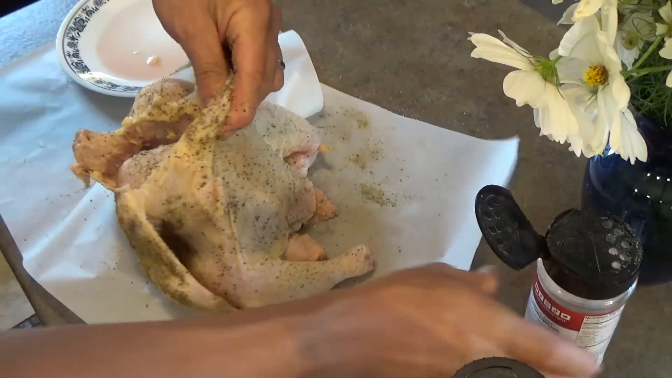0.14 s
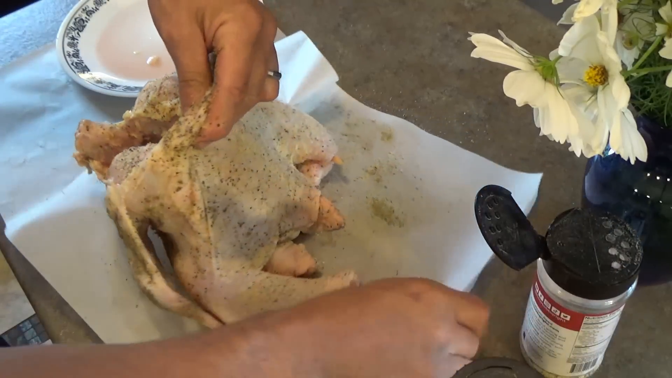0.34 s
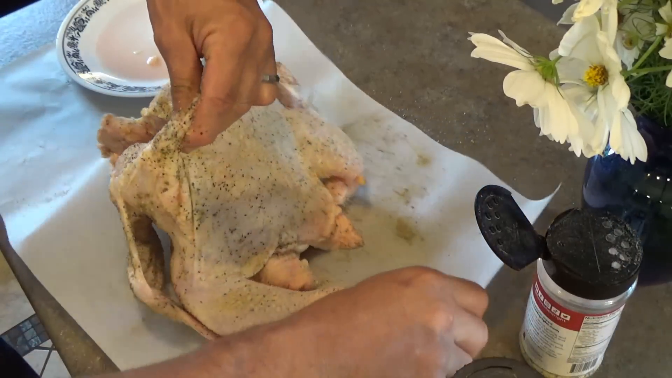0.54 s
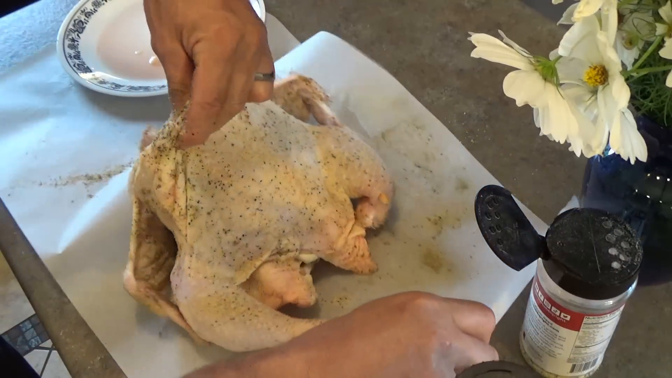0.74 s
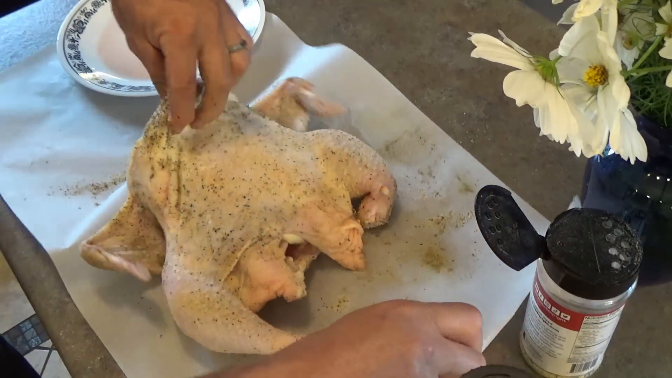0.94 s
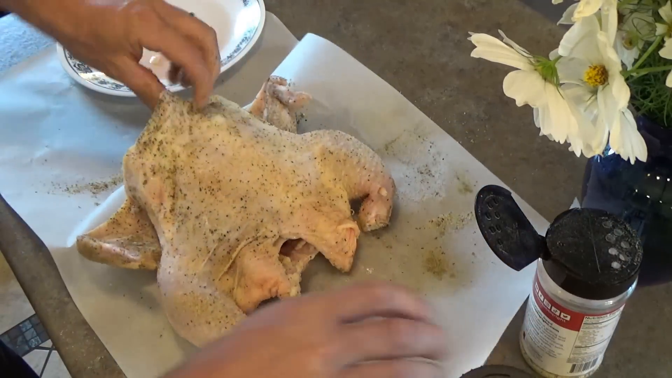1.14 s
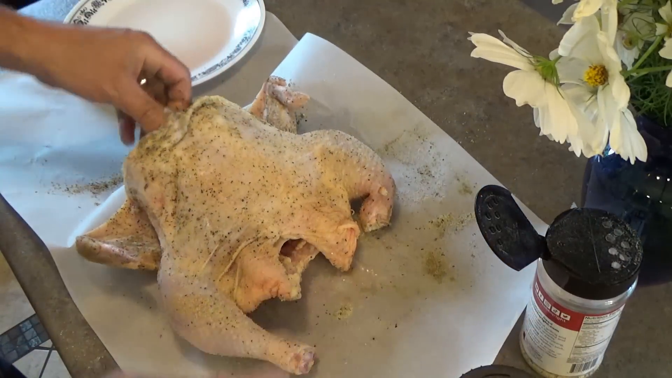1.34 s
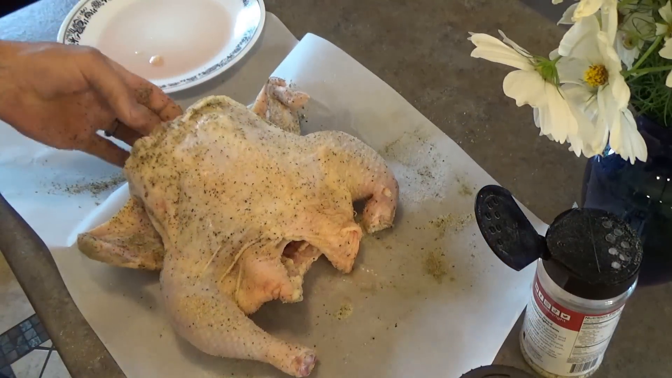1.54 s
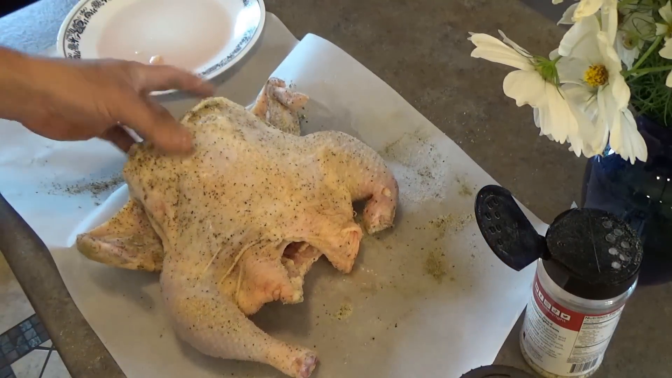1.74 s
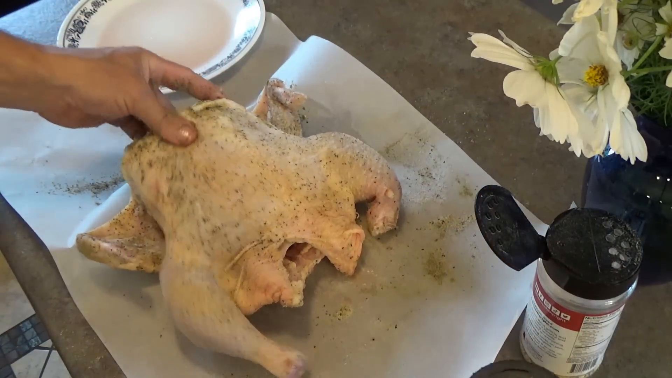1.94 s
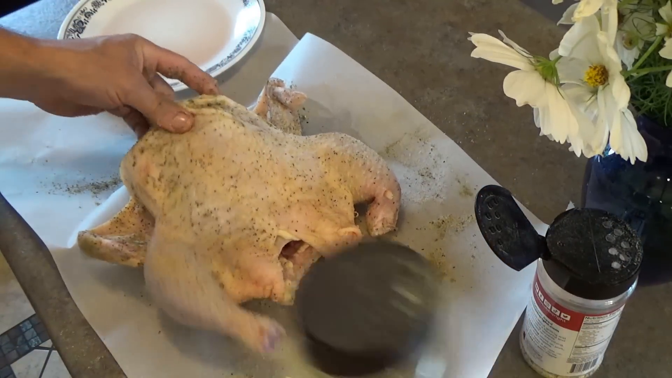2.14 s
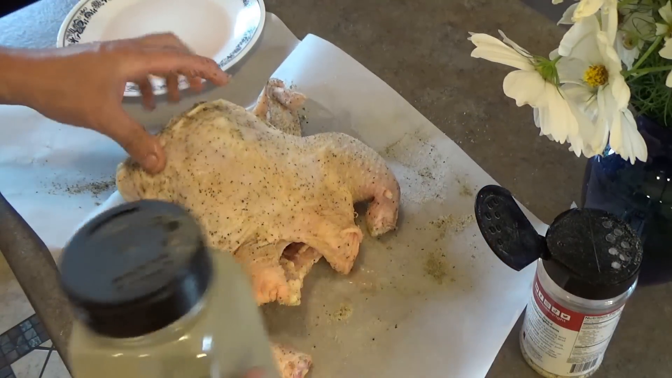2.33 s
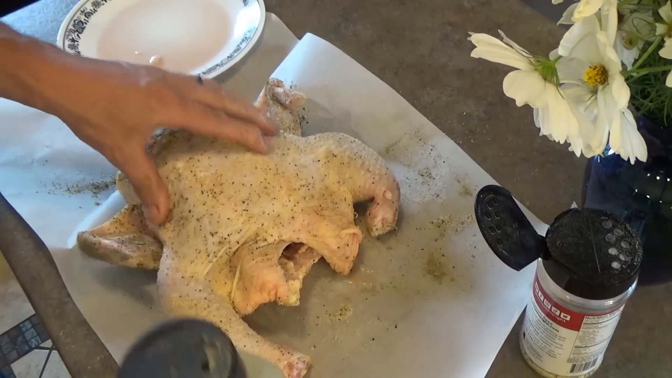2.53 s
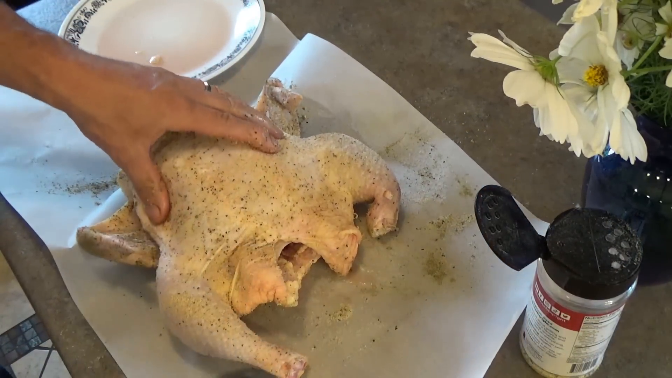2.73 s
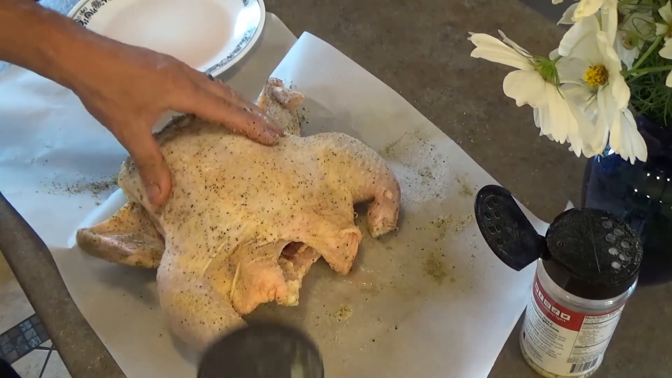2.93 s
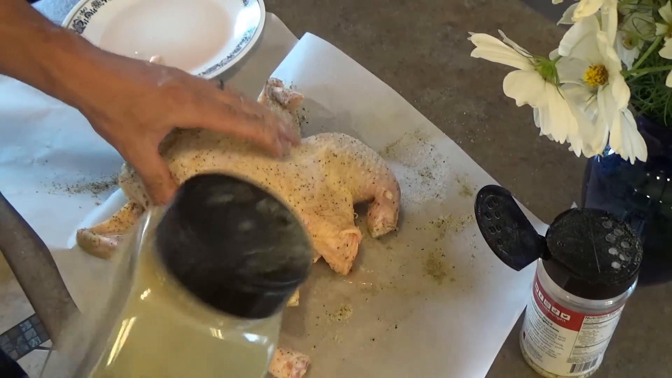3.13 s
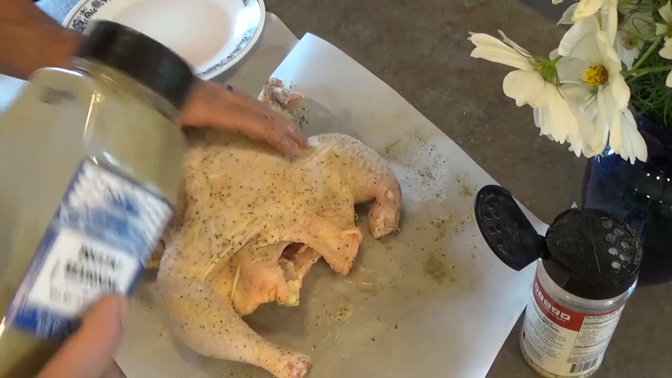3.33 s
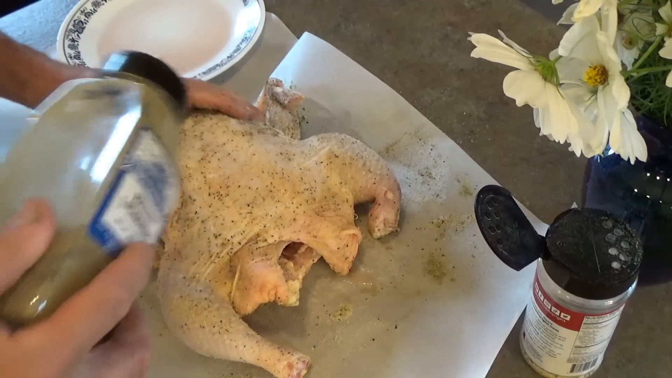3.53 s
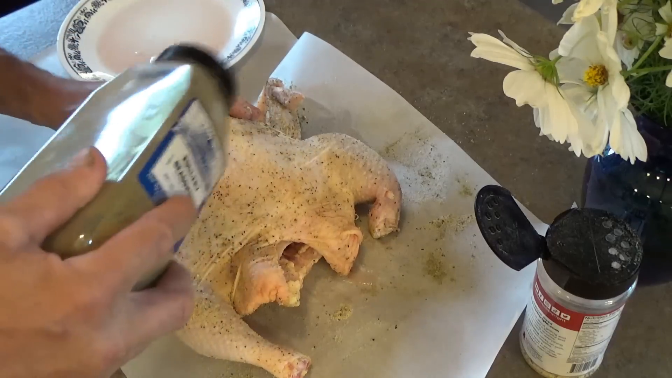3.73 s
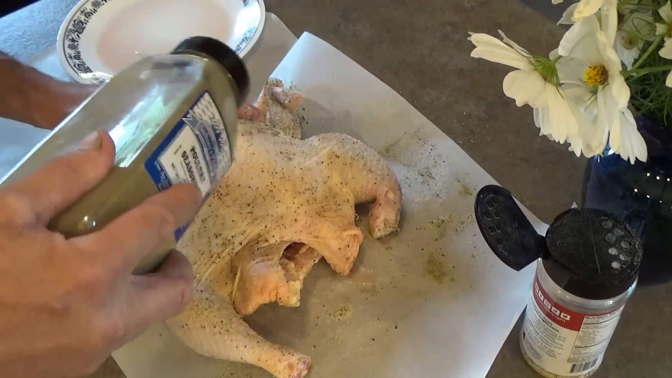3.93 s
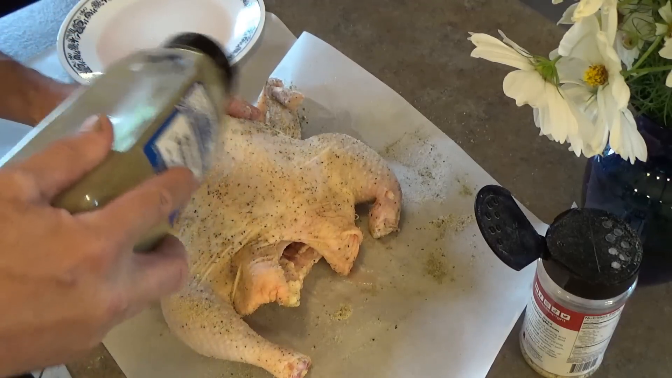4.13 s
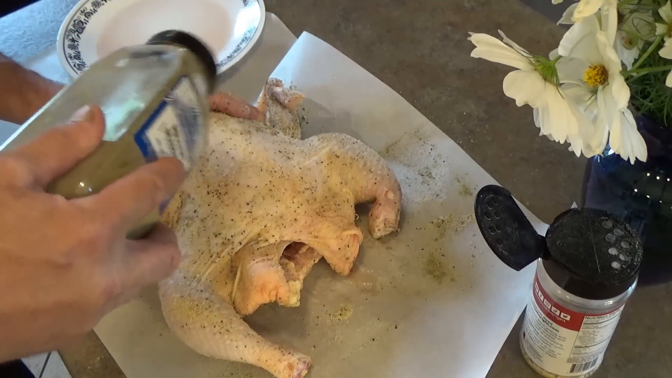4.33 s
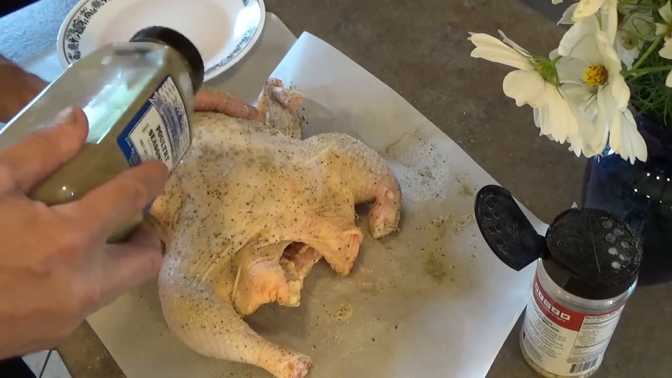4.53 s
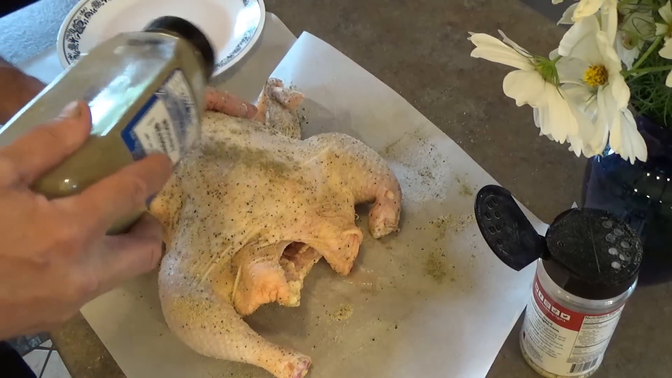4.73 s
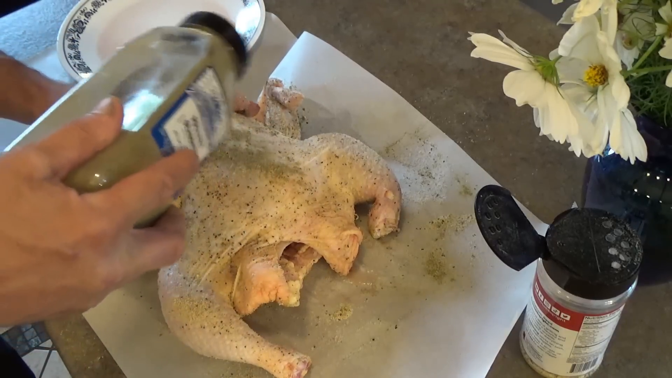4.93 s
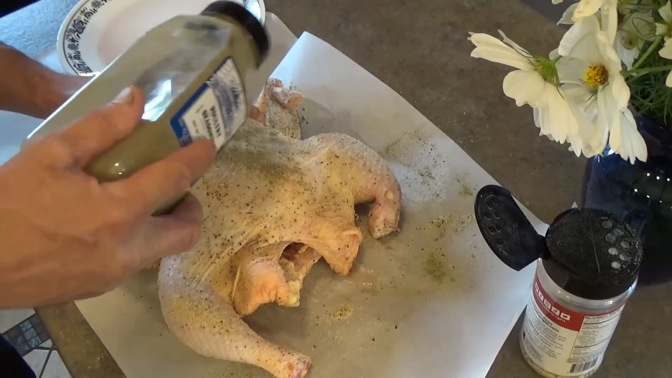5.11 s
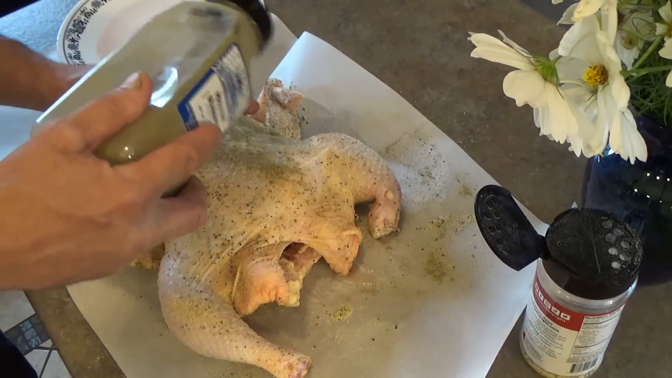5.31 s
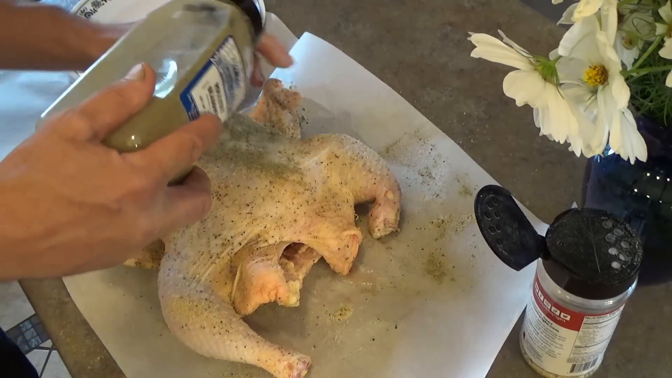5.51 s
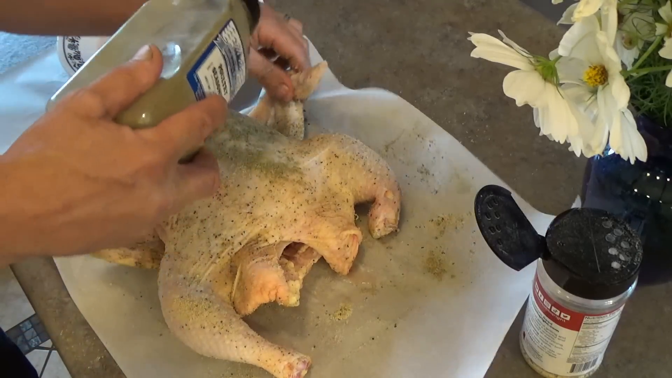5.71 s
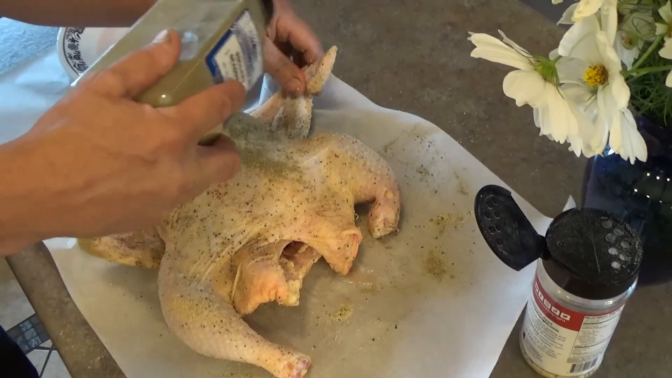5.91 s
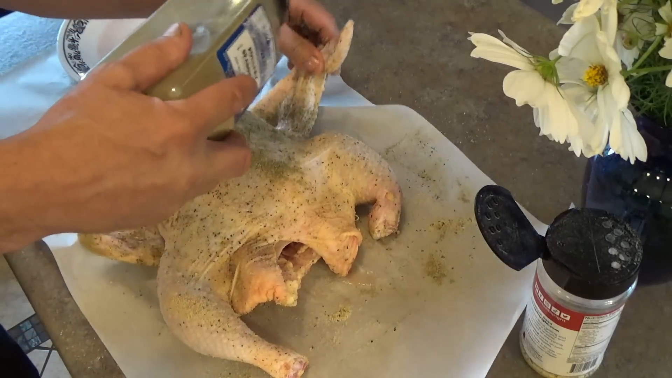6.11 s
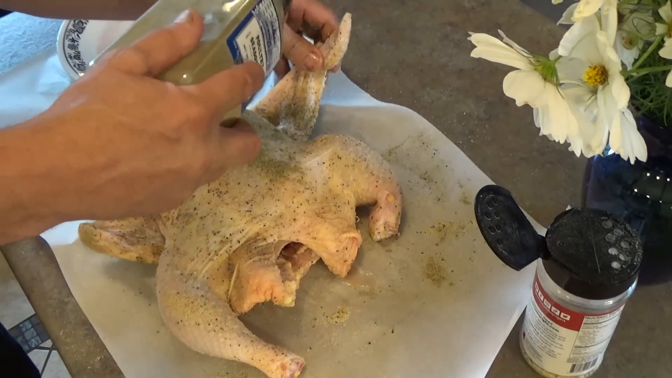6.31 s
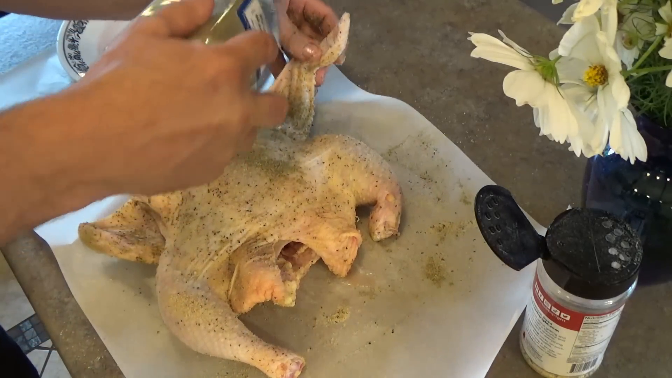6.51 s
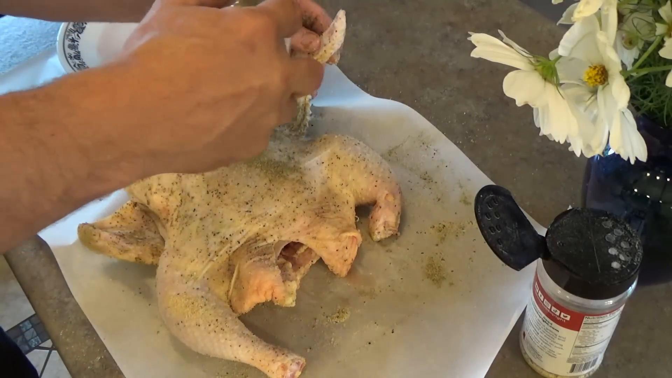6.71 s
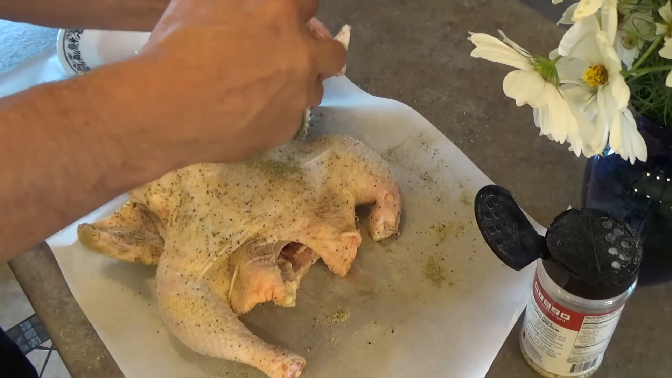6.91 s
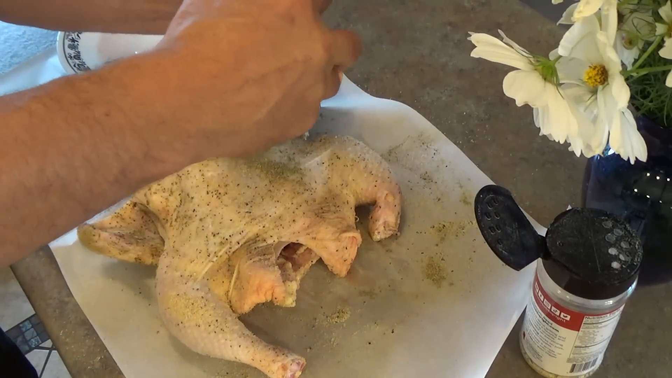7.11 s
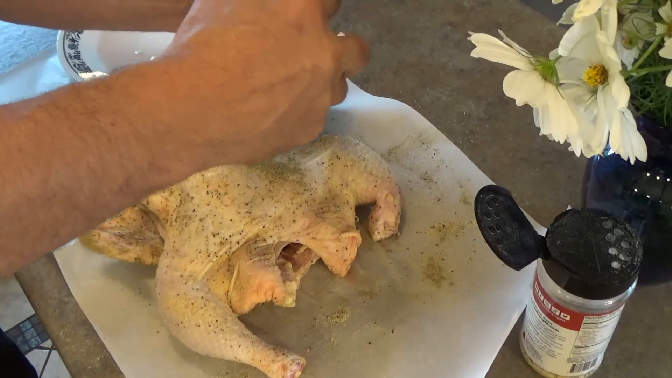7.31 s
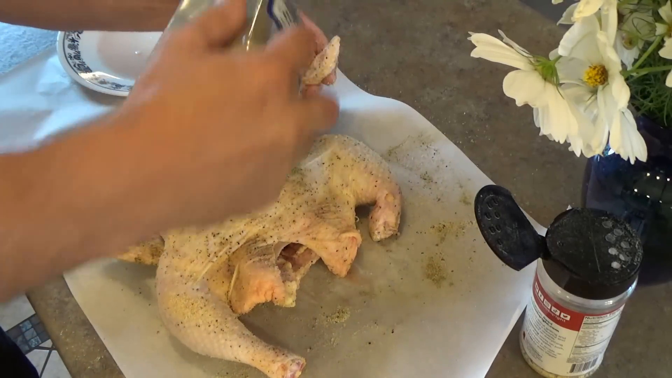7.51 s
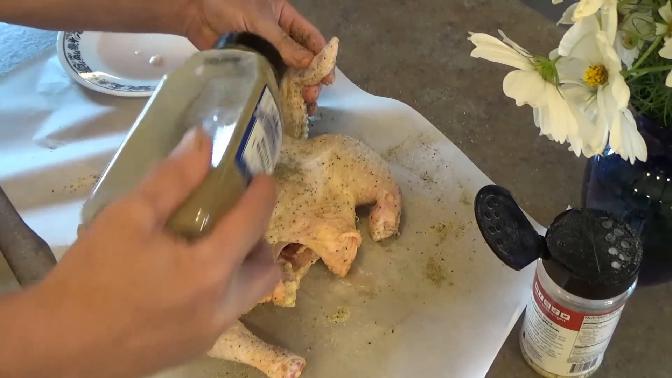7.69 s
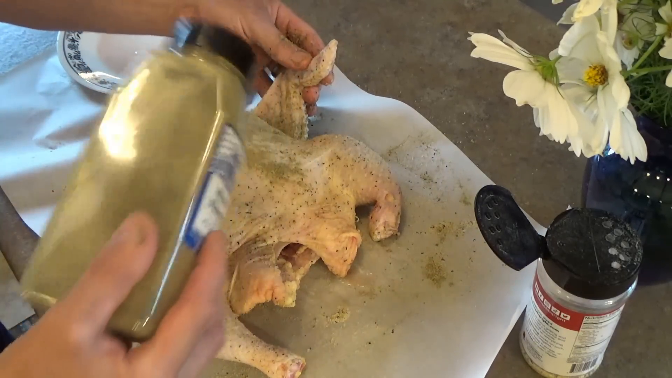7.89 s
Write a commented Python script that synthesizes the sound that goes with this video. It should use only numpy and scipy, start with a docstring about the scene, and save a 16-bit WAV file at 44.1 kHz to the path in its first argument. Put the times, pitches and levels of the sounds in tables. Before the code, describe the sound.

Butcher paper crackles and snaps loudly as a raw chicken is turned, then a bottle bumps and seasoning powder hisses in soft quick shakes.

```python
"""A raw chicken is turned on butcher paper close to the microphones in a small kitchen: buckling creases crackle and snap.
A big plastic bottle of seasoning bumps the counter, its damped modes ringing; tilts and soft strokes make the powder hiss.
Then a wing is lifted and the paper crackles again; hands rub wet skin, and fingers squeak on the plastic.
Something hollow clunks, a blow through a body's resonances.
Behind it all, coloured noise and hum lines make a fan, and a pulsed sine a faint electronic whine."""
import sys
import numpy as np
from scipy import signal
from scipy.fft import rfft, irfft
from scipy.io import wavfile
from scipy.ndimage import uniform_filter1d, minimum_filter1d

SR = 44100
rng = np.random.default_rng(int(sys.argv[2]) if len(sys.argv) > 2 else 0)


def master(y):
    """Save y as 16-bit WAV."""
    cut = np.clip(np.atleast_2d(y).T, -1, 1)
    pcm = np.round(cut * 32767)  # scale
    wavfile.write(sys.argv[1], SR, pcm.astype(np.int16))


N = 350581
TIME = np.arange(N) / SR  # [s]

# colour of the buckling paper: (frequency [Hz], relative density [dB per Hz])
PAPER_COLOUR = [(100, -42), (300, -21.5), (700, -6.5), (1100, -5), (1650, 0), (2600, -0.4), (5000, -0.16),
                (7000, -3), (9400, -4), (12000, -16.5), (16000, -26)]
# colour of the seasoning powder: (frequency [Hz], relative density [dB per Hz])
POWDER_COLOUR = [(400, -29), (1500, 3.5), (4300, 3.5), (9500, 0.5), (12000, -13), (16000, -30)]
# how hard the wrist strokes throw powder at the lid: (time [s], relative level [dB])
SHAKE_FORCE = [(3.6, -47), (4.0, -37.5), (4.3, -44.5), (4.8, -37.5), (5.1, -42.5), (5.45, -38.5)]


def paper(full_db=-18, clump_db=3.0, clump_s=.005, lowest_hz=180):
    """Loud snaps over a fine crackle that thickens as the sheet bends harder, and the duller rasp of the sheet sliding."""
    # the loudest creases snapping through: (time [s], level over 10 ms [dB], pitch [Hz], length [s])
    loud_creases = [(0.0389, -22, 5750, 0.0015), (0.0603, -16, 5670, 0.0011), (0.0914, -19, 3400, 0.0054),
                    (0.1627, -15, 5200, 0.003), (0.2044, -15.5, 6000, 0.0029), (.2105, -12, 3570, 0.013),
                    (0.2719, -15, 6500, 0.0014), (.2876, -14.5, 4200, 0.0048), (.3091, -11.5, 4940, .014),
                    (0.3391, -12.5, 4870, 0.005), (0.3632, -14.5, 6800, 0.002), (.3697, -17.5, 4800, .002),
                    (.385, -15, 5200, 0.0022), (.421, -14, 4900, 0.0063), (0.4365, -16, 4500, .002),
                    (.504, -14.5, 5200, 0.0036), (0.7375, -18.5, 3580, 0.0011),
                    (0.7665, -20, 4040, 0.00063), (0.8018, -14, 3570, 0.0033), (.8584, -21, 1890, 0.0045),
                    (0.8785, -11, 4900, 0.0025), (0.941, -16.5, 3450, 0.00084),
                    (.9635, -22.5, 5200, 0.00045), (.9931, -32, 5400, 0.00096),
                    (1.0024, -19.5, 5300, 0.00073), (1.2089, -25.5, 4500, 0.00056),
                    (1.2715, -34, 3930, 0.00089), (1.288, -31.5, 9000, 0.0011),
                    (1.4605, -26.5, 3500, 0.0014), (1.5612, -27, 4600, 0.0012),
                    (1.5698, -30.5, 2700, .0012), (1.6314, -22, 2750, 0.00075),
                    (1.9184, -26.5, 5900, 0.0013), (1.9336, -32, 3000, 0.001), (2.0862, -36, 5760, 0.001),
                    (2.1522, -26, 6000, 0.0008), (2.1788, -30, 4700, 0.0056), (4.7872, -36.5, 4000, 0.0011),
                    (4.8044, -33.5, 6100, 0.002), (5.5114, -17.5, 4300, 0.0032), (5.5475, -18, 5130, 0.011),
                    (5.7532, -25.5, 4200, 0.004), (5.7726, -18.5, 4400, 0.0014),
                    (5.9518, -23.5, 4800, 0.004), (6.0428, -10.5, 5800, 0.0019), (6.054, -20, 6000, 0.009),
                    (6.3207, -33.5, 4830, .002), (6.4444, -28.5, 5840, 0.016)]
    # how hard the sheet bends while the bird is turned: (time [s], crackle level [dB])
    turning = [(0, -30.5), (.18, -27), (.29, -22.5), (.48, -16), (.58, -20.5), (.75, -25), (.85, -23.5),
               (1.03, -23), (1.19, -43.5)]
    # hands push and pull at the bird and the sheet flexes: (start [s], length [s], crackle level [dB])
    flexes = [(1.2, 0.99, -44.5), (5.435, 0.072, -44.5), (5.496, 0.027, -27.5), (5.56, 0.9, -41),
              (5.738, 0.01, -34), (6.29, 0.041, -48.5), (6.605, 0.049, -45.5)]
    # the weight of the bird dragging the sheet over the counter: (time [s], level [dB])
    dragging = [(0, -51), (.48, -35.5), (.72, -33.5), (.88, -20.5), (1.15, -67)]
    # colour of the sliding sheet: (frequency [Hz], relative density [dB per Hz])
    sheet_colour = [(80, -29), (250, -20.5), (800, -0.5), (1600, 7.5), (2600, 4), (6000, -22)]

    bending = gain_curve(turning) + gestures(flexes, attack_s=0.0043, release_db_per_s=120)
    per_s = 14000 * (bending / from_db(full_db)) ** .8
    # one buckle sets off its neighbours, so the grains come in clumps
    clumps = from_db(clump_db * slow_noise(clump_s))
    crackle_grains = grains(per_s=per_s, spread_db=1.5, spectrum=PAPER_COLOUR, even_s=0.15)
    crackle = bending * rms_one(clumps) * crackle_grains
    lesser = bending * small_snaps()
    drag = gain_curve(dragging) * grains(per_s=2500, spread_db=6.5, spectrum=sheet_colour, even_s=0.056)
    loud = snaps(loud_creases, PAPER_COLOUR, focus=1.17, width_share=0.99)
    return high_pass(loud + crackle + lesser + drag, lowest_hz)


def small_snaps(per_s=25, level_db=-8, length_s=0.0023, spread_db=3):
    """Lesser creases give way at random, each in a short dying run of buckles; level is against the crackle's bending."""
    starts = (rng.random(N) < per_s / SR) * from_db(spread_db * rng.standard_normal(N))
    runs = signal.lfilter([1], [1, -np.exp(-1 / (length_s * SR))], starts + 1e-18)
    return from_db(level_db) * rms_one(coloured(runs * rng.standard_normal(N), PAPER_COLOUR))


def snaps(rows, spectrum, focus, width_share, low_share=0.23, crack_s=0.00023, size=2048):
    """Each snap is a crack and a dying run of tiny buckles that ring a patch of the sheet around its own pitch."""
    out, t = np.zeros(N), np.arange(size) / SR
    for (s, db, hz, length), buckles in zip(rows, rng.standard_normal((len(rows), size))):
        decay_s = 1.27 * max(length, 2e-4)
        run = unit_energy(buckles * np.exp(-(t / decay_s) ** 0.76))
        # the crack stands out only in a short snap
        force = run + signal.unit_impulse(size) * min(crack_s / max(length, 2e-4), 1)
        # a small patch radiates little below its pitch
        radiated = high_pass(force, low_share * hz)
        focused = radiated + focus * resonance(radiated, hz, width_share * hz)
        patch = unit_energy(coloured(focused, spectrum))
        add(out, s, from_db(db) * np.sqrt(SR / 100) * patch)  # level over 10 ms
    return out


def bottle(lowest_hz=205, size=8192):
    """Bumps and scraping ring the damped modes of the filled bottle; its wall and lid click under the fingers."""
    # the bottle rocking on the counter: (time [s], blow level before softening [dB], brightness [Hz])
    bumps = [(2.533, -9, 2190), (2.5798, -10, 560), (2.6725, -9.5, 330), (2.761, -18.5, 900)]
    # modes of the filled bottle: (frequency [Hz], relative level [dB], 60 dB decay time [s])
    modes = [(261, -11.5, 0.038), (364, -15, 0.049), (522, -9, 0.026), (720, -12.5, 0.026),
             (990, -2.5, 0.0077), (1270, -7.5, 0.0042), (1850, -5, 0.0055)]
    # its base scraping between the bumps: (centre [s], level [dB], bell width [s])
    scrapes = [(2.56, -34, 0.015), (2.68, -44, 0.11)]
    # seasoning rattling in the rocking bottle: (centre [s], level [dB], bell width [s])
    rattling = [(2.68, -44.5, 0.092)]
    # plastic clicks and stray granules: (time [s], relative level over 10 ms [dB], pitch [Hz], length [s])
    click_rows = [(2.5328, -28, 1240, 0.004), (2.5551, -31, 3700, 0.01), (2.6715, -35, 1980, 0.0062),
                  (2.7594, -32, 5170, 0.008), (2.9021, -28, 8000, 0.00063), (3.4136, -41.5, 7100, 0.0082),
                  (4.3562, -45.5, 7640, 0.0011), (4.7215, -43.5, 6500, 0.00087),
                  (7.3421, -33.5, 5030, 0.0013), (7.4751, -43.5, 4500, 0.0016)]
    # colour of the plastic: (frequency [Hz], relative density [dB per Hz])
    plastic_colour = [(150, -14), (600, 10.5), (2000, 4), (9300, 7.5), (12000, -9.5), (16000, -15)]

    force, t = np.zeros(N), np.arange(size) / SR
    for s, db, bright_hz in bumps:
        add(force, s, from_db(db) * low_pass(signal.unit_impulse(size), bright_hz))
    hz, mode_db, t60 = np.transpose(modes)[:, :, None]
    ring = np.sum(from_db(mode_db - 60 * t / t60) * np.sin(2 * np.pi * hz * t), axis=0)
    rubbing = grains(per_s=1700, spread_db=2.0, spectrum=plastic_colour, even_s=0.062)
    scraping = swells(scrapes) * rms_one(signal.oaconvolve(rubbing, ring)[:N])
    body = signal.oaconvolve(force, ring)[:N] + scraping
    loose = grains(per_s=700, spread_db=1.5, spectrum=plastic_colour, even_s=0.05)
    rattle = swells(rattling) * rms_one(resonance(loose, hz=1740, width_hz=220))
    clicks = from_db(1.5) * snaps(click_rows, plastic_colour, focus=2.2, width_share=1.0)
    return high_pass(body, lowest_hz, order=3) + rattle + clicks + squeaks()


def squeaks(width_hz=420):
    """The skin sticks and slips on the bottle wall, each time in a narrow band of its own."""
    # fingers rubbing on the plastic: (start [s], length [s], level [dB], pitch [Hz])
    rubs = [(6.914, 0.1, -53, 2210), (7.008, 0.02, -50, 10600), (7.013, 0.036, -54, 6600),
            (7.715, .03, -50.5, 2580), (7.827, 0.1, -54, 4300)]
    out = np.zeros(N)
    for s, length, db, hz in rubs:
        gain = gestures([(s, length, db)], attack_s=.006, release_db_per_s=160)
        band = resonance(rng.standard_normal(N), hz, width_hz)
        out += gain * rms_one(resonance(band, hz, 2 * width_hz))
    return out


def seasoning(stroke_s=0.011, thrown_above_hz=3500):
    """Powder hisses brightly once per quick stroke of the wrist, and steadily while it slides along the wall."""
    # the bottle is tilted and powder slides: (start [s], length [s], relative level [dB])
    tilts = [(2.28, 0.54, -39.5), (3.14, 0.31, -39), (6.65, 0.55, -39.5), (7.5, 0.52, -45.5)]
    powder = from_db(-11.5) * grains(per_s=7000, spread_db=5.0, spectrum=POWDER_COLOUR, even_s=0.076)
    strokes = gain_curve(SHAKE_FORCE) * pulse_train(hz=11.77, peak_s=3.722, width_s=stroke_s)
    sliding = gestures(tilts, attack_s=0.017, release_db_per_s=46)
    return strokes * high_pass(powder, thrown_above_hz) + sliding * powder


def granules(lowest_hz=4000):
    """Now and then a coarse grain drops from the shaken bottle and ticks on the paper."""
    ticks = high_pass(grains(per_s=15, spread_db=3.0, spectrum=POWDER_COLOUR, even_s=1.0), lowest_hz)
    return from_db(-17.5) * gain_curve(SHAKE_FORCE) * ticks


def hands():
    """Soft, dull friction of hands patting and rubbing the wet skin."""
    # pats and rubs: (centre [s], level [dB], bell width [s])
    touches = [(0.0, -36, 0.01), (0.3, -44, 0.27), (1.08, -60.5, 0.043), (1.42, -51.5, 0.59),
               (1.81, -48, 0.054), (5.785, -38.5, 0.019)]
    # colour of the skin: (frequency [Hz], relative density [dB per Hz])
    skin_colour = [(30, -36), (180, -14), (370, 0.5), (650, -0.5), (1500, -8), (5000, -100)]
    return swells(touches) * grains(per_s=2000, spread_db=5.0, spectrum=skin_colour, even_s=0.075)


def clunks(size=16384):
    """A short scuffing blow into the resonances of a hollow body."""
    # blows on a hollow body: (time [s], relative level over 10 ms [dB], length [s], brightness [Hz])
    blows = [(3.102, -45, 0.0097, 1400), (3.14, -41, 0.0051, 700), (7.291, -28, 0.016, 890),
             (7.914, -28.5, 0.058, 9050)]
    # resonances of the hollow body: (frequency [Hz], width [Hz], relative level [dB])
    hollow_modes = [(239, 42, -5.5), (590, 110, 0.5), (740, 62, 8), (860, 210, 1), (1198, 63, 12.5),
                    (1480, 140, 3), (1880, 340, -0.5), (2350, 1200, -5), (4130, 6800, -12.5)]
    out, t = np.zeros(N), np.arange(size) / SR
    for (s, db, length, bright_hz), contact in zip(blows, rng.standard_normal((len(blows), size))):
        blow = low_pass(contact * t * np.exp(-2 * t / length), bright_hz)
        # neighbouring resonances have opposite signs
        body = sum((-1) ** k * from_db(mode_db) * resonance(blow, hz, width_hz)
                   for k, (hz, width_hz, mode_db) in enumerate(hollow_modes))
        add(out, s, from_db(db) * np.sqrt(SR / 100) * unit_energy(body))  # level over 10 ms
    return out


def kitchen(x, count=4):
    """The sound moves from spot to spot on the counter; each spot has echoes of its own, and all feed the standing waves."""
    # low resonances of the kitchen: (frequency [Hz], width [Hz], level [dB])
    standing_waves = [(356, 9.5, 3), (510, 9.1, -3)]
    spot = (TIME * 10).astype(int) % count  # ten moves a second
    shares = [np.sqrt(np.abs(uniform_filter1d(1. * (spot == k), size=1024))) for k in range(count)]
    room = sum(from_db(db) * resonance(x, hz, width_hz) for hz, width_hz, db in standing_waves)
    for share in shares:
        room = room + signal.oaconvolve((x * share)[None], echoes(), axes=1)[:, :N]
    return room


def echoes(build_s=0.00097, size=24576):
    """Stereo response of the kitchen to one spot: dense echoes that build up quickly and die band by band."""
    # how long the kitchen rings: (frequency [Hz], 60 dB decay time [s])
    decay_times = [(100, 0.28), (300, 0.63), (1000, 0.42), (3000, 0.43), (7000, 0.49), (14000, 0.48)]
    t, hz = np.arange(size) / SR, np.fft.rfftfreq(size, 1 / SR)
    white, tail = rfft(rng.standard_normal((2, size))), 0
    centres = [centre for centre, t60 in decay_times]
    for (centre, t60), alone in zip(decay_times, np.eye(len(decay_times))):
        band = irfft(white * at_hz(list(zip(centres, alone)), hz))
        tail = tail + band * from_db(-60 * t / t60)
    mid, side = tail * (1 - np.exp(-(t / build_s) ** 2))
    return diffuse(unit_energy(mid), unit_energy(side))


def background(fan_db=-50.5, whine_hz=3202, whine_db=-49, pulse_s=0.0031, waver_db=1.4, waver_s=0.1):
    """Fan noise with its hum lines, and a faint electronic whine in quick pulses of slightly wavering level."""
    # colour of the fan: (frequency [Hz], relative density [dB per Hz])
    fan_colour = [(30, -7), (105, -22), (225, -2), (560, 3), (1000, -3.5), (1900, -7.5), (3700, -9.5),
                  (9000, -14), (16000, -21.5)]
    # hum lines of the fan: (frequency [Hz], level [dB])
    hum_lines = [(592.2, -63.5), (829, -64), (1184, -65.5)]
    air = diffuse(*[rms_one(coloured(white, fan_colour)) for white in rng.standard_normal((2, N))])
    hum = sum(from_db(db) * rms_one(resonance(rng.standard_normal(N), hz, width_hz=2.8)) for hz, db in hum_lines)
    waver = from_db(waver_db * slow_noise(waver_s))
    pulses = pulse_train(hz=29.975, peak_s=.0163, width_s=pulse_s)
    whine = np.sqrt(2) * waver * pulses * np.sin(2 * np.pi * whine_hz * TIME)
    return from_db(fan_db) * air + hum + from_db(whine_db) * whine


def diffuse(mid, side):
    """Sound from all around reaches the two close microphone ports nearly alike."""
    # stereo width of diffuse sound: (frequency [Hz], side filter gain [dB])
    side_gain = [(150, -27.5), (600, -8), (2000, -5), (8500, -7), (12000, -20)]
    side = coloured(side, side_gain)
    return np.array([mid + side, mid - side])


def grains(per_s, spread_db, spectrum, even_s):
    """Random clicks, many small and few large, coloured and held near unit power."""
    sizes = from_db(spread_db * np.minimum(rng.exponential(1, N), 4.5)) * rng.choice([-1, 1], N)
    x = coloured(sizes * (rng.random(N) < per_s / SR), spectrum)
    power = uniform_filter1d(x * x, int(even_s * SR) + 1)
    return x / np.sqrt(np.maximum(power, 1e-9))


def slow_noise(smooth_s):
    """Random drift of unit power: white noise averaged over a short time."""
    return rms_one(uniform_filter1d(rng.standard_normal(N), int(smooth_s * SR) + 1))


def pulse_train(hz, peak_s, width_s):
    """Regular bell-shaped pulses of height one."""
    from_peak = ((TIME - peak_s) * hz + .5) % 1 - .5
    return np.exp(-.5 * (from_peak / hz / width_s) ** 2)


def gestures(rows, attack_s, release_db_per_s):
    """Gain in time from (start, length, dB) rows: each swells, holds for its length and dies away."""
    gain = np.zeros(N)
    for s, length, db in rows:
        attack = np.clip((TIME - s) / attack_s, 0, 1)
        gain += attack * from_db(db - release_db_per_s * np.clip(TIME - s - length, 0, 2))
    return gain


def gain_curve(rows):
    """Gain in time from (s, dB) rows, silent outside them."""
    s, db = np.transpose(rows)
    return from_db(np.interp(TIME, s, db, left=-150, right=-150))


def swells(rows):
    """Gain in time from bell-shaped (centre, dB, width) swells."""
    return sum(from_db(db) * np.exp(-.5 * np.minimum(((TIME - s) / width) ** 2, 100)) for s, db, width in rows)


def coloured(x, spectrum, size=4096):
    """Causal (minimum-phase) filter with the given spectrum."""
    cepstrum = irfft(np.log(from_db(at_hz(spectrum, np.fft.rfftfreq(size, 1 / SR)))))
    cepstrum[1:size // 2] *= 2
    cepstrum[size // 2 + 1:] = 0
    return signal.oaconvolve(x, irfft(np.exp(rfft(cepstrum))))[:len(x)]


def at_hz(points, hz):
    """Read a table on a log-frequency axis."""
    known_hz, values = np.transpose(points)
    return np.interp(np.log(np.maximum(hz, 1)), np.log(known_hz), values)


def resonance(x, hz, width_hz):
    """Two-pole band-pass with gain one on top."""
    r = np.exp(-np.pi * width_hz / SR)
    feedback = [1, -2 * r * np.cos(2 * np.pi * hz / SR), r * r]
    return signal.lfilter(np.array([1, 0, -1]) * (1 - r * r) / 2, feedback, x)


def low_pass(x, hz, order=1):
    """A soft contact takes the treble away."""
    return signal.sosfilt(signal.butter(order, min(hz, .45 * SR), fs=SR, output="sos"), x)


def high_pass(x, hz, order=2):
    """Small or thin bodies radiate no deep bass."""
    return signal.sosfilt(signal.butter(order, hz, "high", fs=SR, output="sos"), x)


def from_db(db):
    """Decibels to gain."""
    return 10 ** (np.asarray(db) / 20)


def rms_one(x):
    """Scale to unit power."""
    return x / np.sqrt(np.mean(x ** 2) + 1e-20)


def unit_energy(x):
    """Scale so that the squares sum to one."""
    return x / np.sqrt(np.sum(x ** 2) + 1e-20)


def add(track, s, sound):
    """Mix a sound into the track from time s on."""
    start = max(round(s * SR), 0)
    track[start:start + len(sound)] += sound[:max(N - start, 0)]


def scene():
    """Paper, bottle and hands reach the microphones mostly direct, the hollow clunks with more of the room."""
    sheet = paper()
    near = bottle() + hands() + seasoning() + granules()
    hollow = clunks()
    direct = sheet + near + from_db(5) * hollow
    room = kitchen(from_db(-5.5) * sheet + from_db(-6.0) * near + from_db(5.5) * hollow)
    balance = from_db([[.2], [-.2]])  # a touch louder on the left
    return (direct + room) * balance + background()


def record(dry, low_cut_hz=38, cutoff_hz=16000, size=15):
    """A very fast limiter holds down the sharpest peaks; the deepest bass and the top are cut."""
    room_left = 1 / np.maximum(np.abs(dry).max(axis=0), 1)
    limited = dry * uniform_filter1d(minimum_filter1d(room_left, size), size)
    top_cut = signal.ellip(10, .1, 80, cutoff_hz, fs=SR, output="sos")
    return signal.sosfilt(top_cut, high_pass(limited, low_cut_hz))


dry = scene()
out = record(dry)
master(out)
```